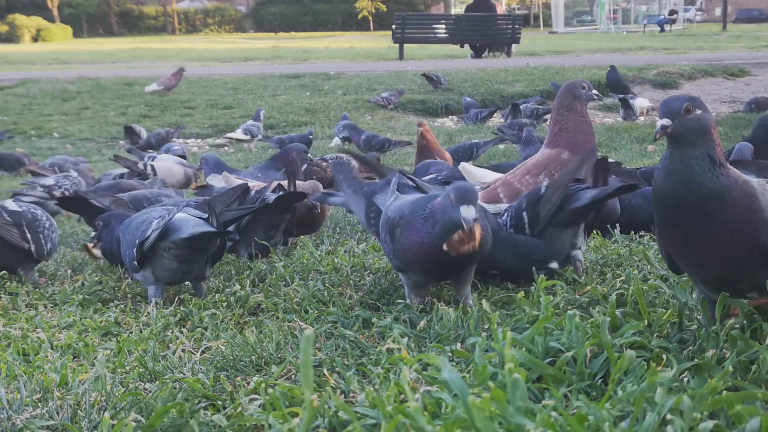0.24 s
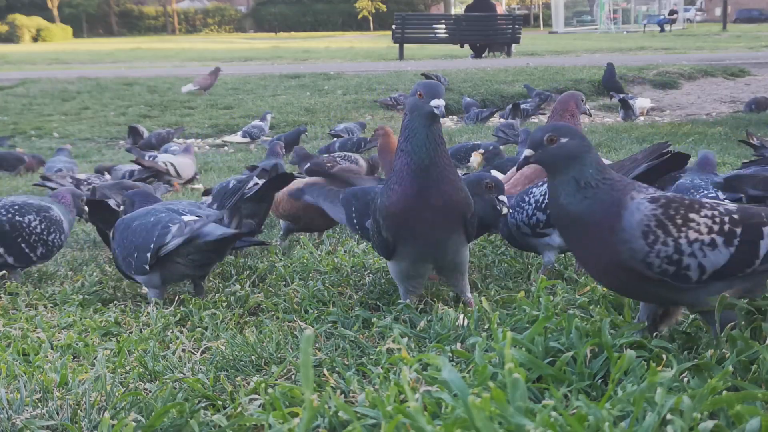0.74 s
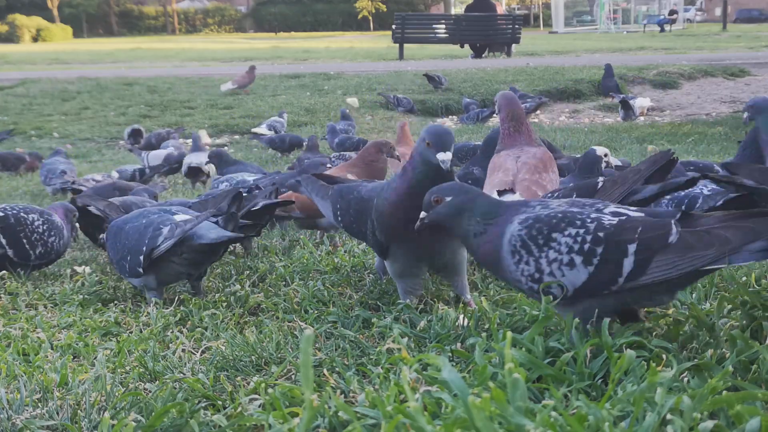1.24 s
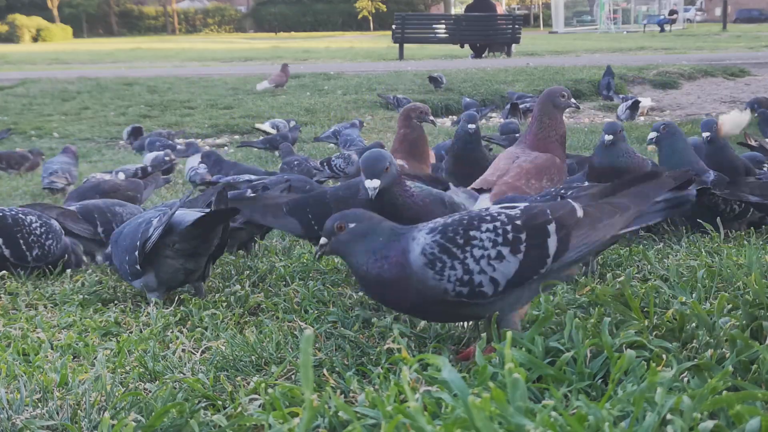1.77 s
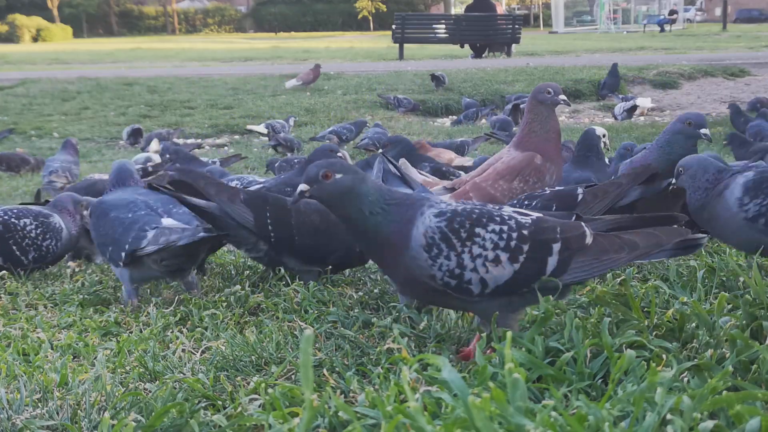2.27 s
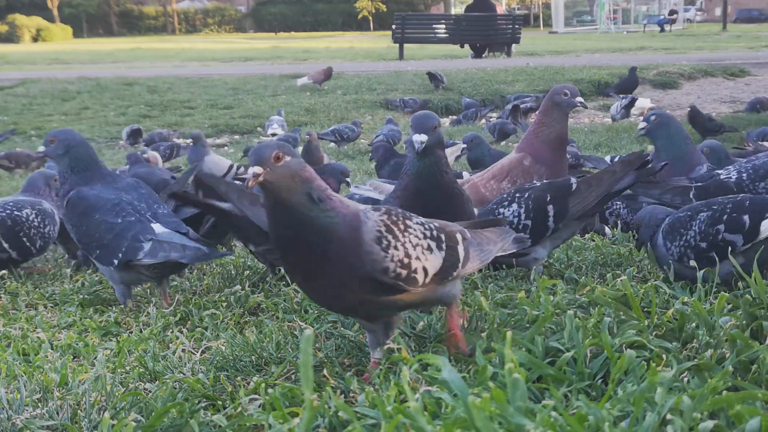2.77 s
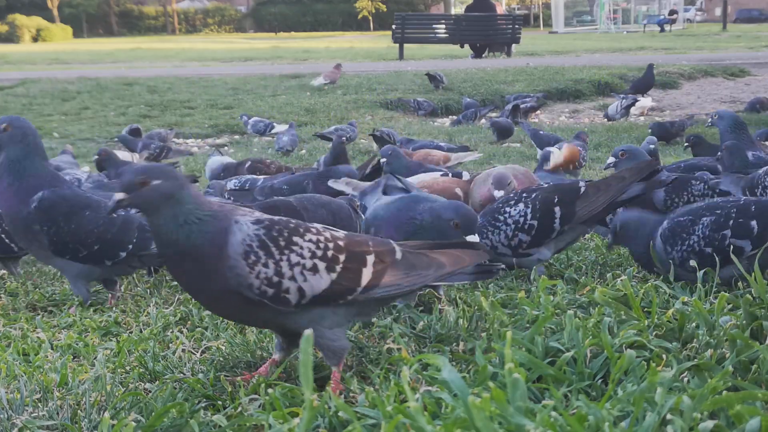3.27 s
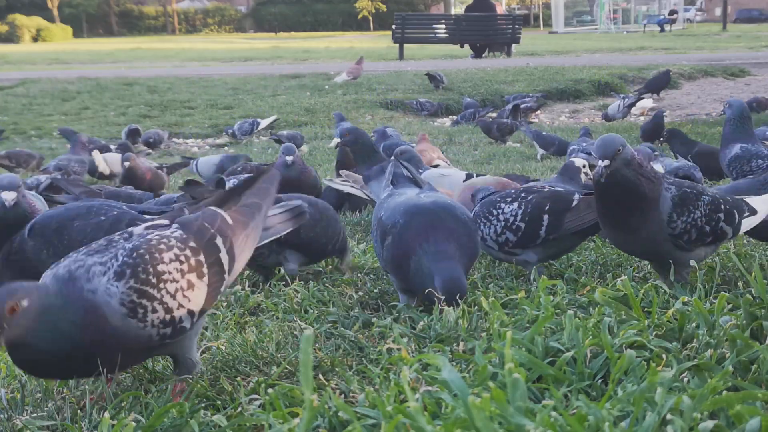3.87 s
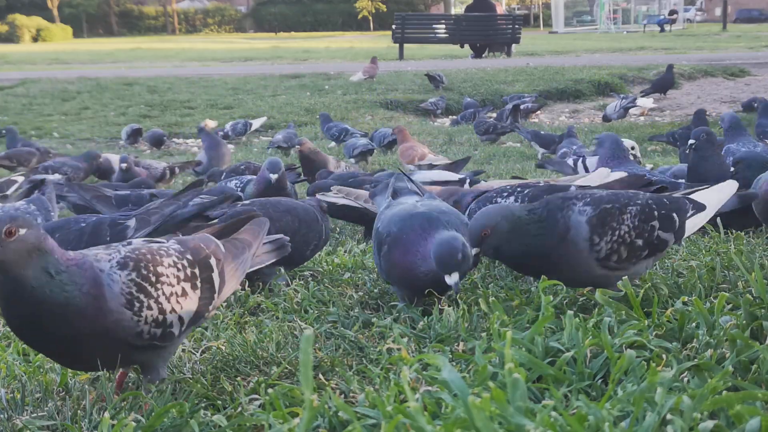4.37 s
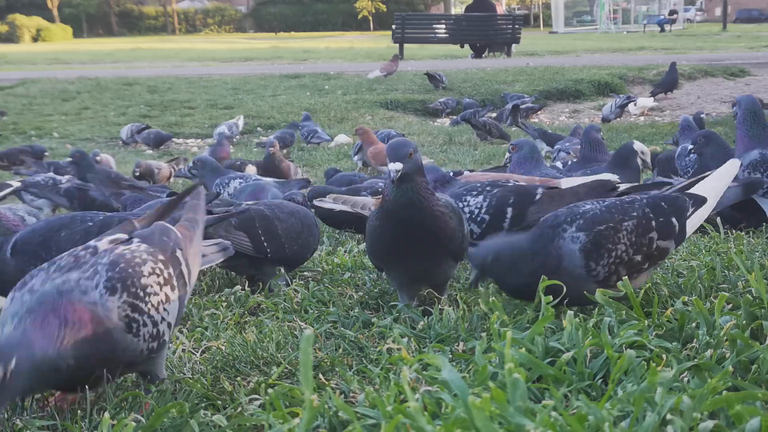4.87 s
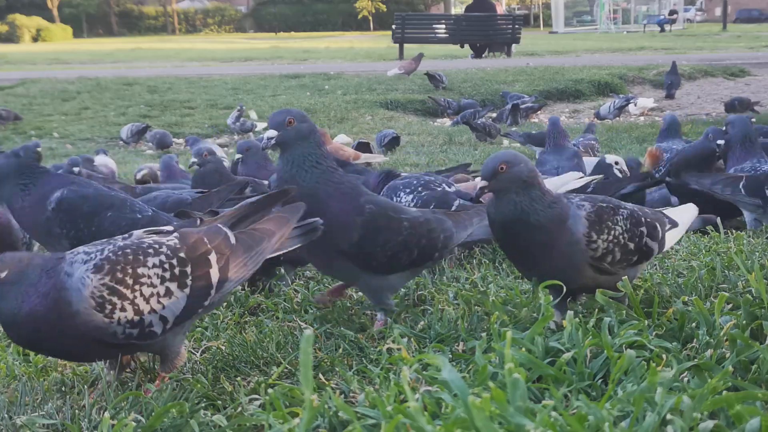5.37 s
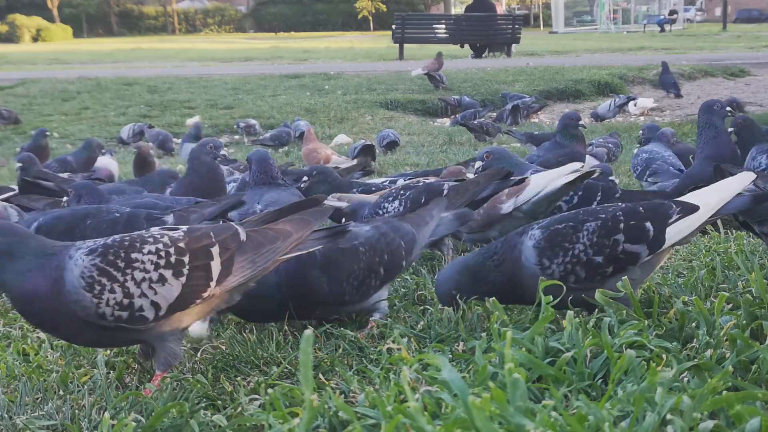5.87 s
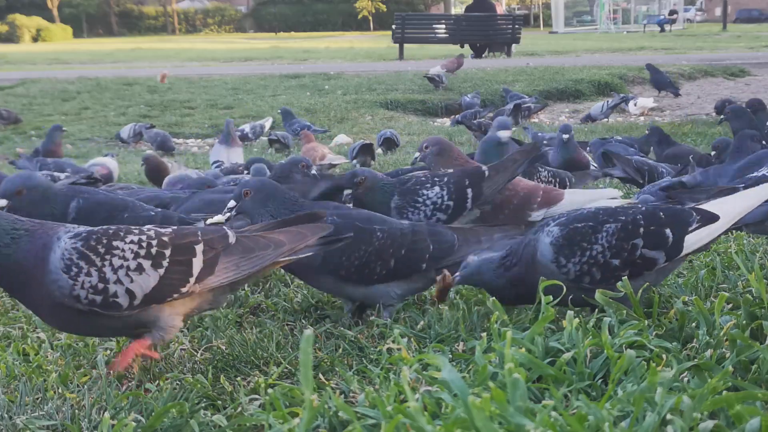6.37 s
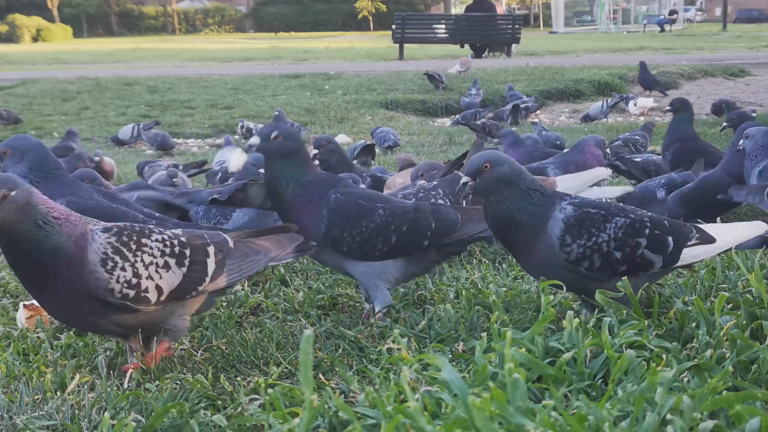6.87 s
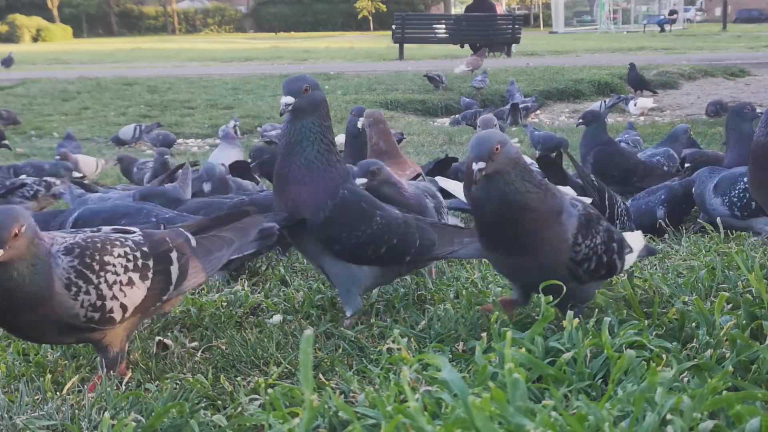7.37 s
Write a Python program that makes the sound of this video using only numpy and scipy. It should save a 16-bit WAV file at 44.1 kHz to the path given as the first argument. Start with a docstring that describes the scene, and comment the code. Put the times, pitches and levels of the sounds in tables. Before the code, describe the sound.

A flock of pigeons feeds close by on a park lawn, with soft throaty clucks, faint coos, beak ticks and grassy rustles. A near bird gives three leaping whistles, then three double whistles. Around four seconds a farther songbird warbles rapidly with echo from trees, joined by brief twitters. Pigeons grow busier near the end. Deep engine throb and traffic rumble continue throughout, in wide outdoor stereo with the microphone low near the birds.

```python
"""Pigeons feed on a park lawn: crop puffs and rolled coos, a low mutter, noise ticks, grassy rustles.
A near bird whistles six phrases and two peeps as near-pure gliding tones.
A farther songbird warbles among echoing trees, with faint calls; a third twitters in glides and chips.
An idling engine and a slowing vehicle rumble as low tones under banded noise of traffic and city."""
import sys
import numpy as np
from scipy import signal
from scipy.io import wavfile
from scipy.ndimage import uniform_filter1d

SR = 44100
rng = np.random.default_rng(int(sys.argv[2]) if len(sys.argv) > 2 else 0)


def inscribe(sig):
    """Save sig as 16-bit PCM at rate SR to the path in sys.argv[1].

    A 1-D sig is mono; a 2-D sig holds one channel per row.
    Samples are clipped to [-1, 1] before scaling.
    """
    pcm = np.round(np.clip(np.atleast_2d(sig).T, -1, 1) * 32767)
    wavfile.write(sys.argv[1], SR, pcm.astype(np.int16))


N = 336924


def amp(db):
    """Decibels to gain."""
    return 10 ** (np.asarray(db) / 20)


def rms_one(x):
    """Scales to unit rms."""
    return x / np.sqrt(np.mean(x ** 2) + 1e-20)


def in_time(rows):
    """Columns of a curve at every sample."""
    s, *columns = np.transpose(rows)
    return [np.interp(np.arange(N) / SR, s, c) for c in columns]


def at_hz(points, hz):
    """Reads a spectrum on a log-frequency axis."""
    point_hz, values = np.transpose(points)
    return np.interp(np.log(hz), np.log(point_hz), values)


def drift(rate_hz):
    """Random wander of spread 1: noise through two equal poles at SR / 40, interpolated."""
    step = 40
    r = np.exp(-2 * np.pi * rate_hz * step / SR)
    warmup = 2000
    noise = rng.standard_normal(N // step + warmup + 2)
    slow = signal.lfilter([1], [1, -2 * r, r * r], noise)[warmup:]
    return np.interp(np.arange(N) / step, np.arange(len(slow)), rms_one(slow))


def resonance(x, hz, width_hz):
    """Two-pole resonance with gain 1 on top."""
    r = np.exp(-np.pi * width_hz / SR)
    zeros = (1 - r * r) / 2 * np.array([1, 0, -1])
    poles = [1, -2 * r * np.cos(2 * np.pi * hz / SR), r * r]
    return signal.lfilter(zeros, poles, x)


def note(rows, edge_s, waver=np.zeros(N)):
    """Samples, phase, fade (sine to unit rms) and level gains of a note; waver bends pitch by a share."""
    s, hz, *levels_db = np.transpose(rows)
    at = np.arange(int(s.min() * SR), min(int(s.max() * SR), N))
    t = at / SR
    fade = np.clip(np.minimum(t - s.min(), s.max() - t) / edge_s, 0, 1)
    cycles = np.cumsum(np.interp(t, s, hz) * (1 + waver[at])) / SR
    phase = 2 * np.pi * (cycles + rng.random())
    return at, phase, np.sqrt(2) * fade, [amp(np.interp(t, s, db)) for db in levels_db]


def glide(row, strength=((1, 0), (2, 0))):
    """Curve rows of a glide with one rounded turn, an even swell or fade and a pitch-dependent strength."""
    start_s, turn_s, end_s, start_hz, turn_hz, end_hz, level_db, swell_db = row
    s = np.linspace(start_s, end_s, 40)
    hz = np.interp(s, (start_s, turn_s, end_s), (start_hz, turn_hz, end_hz))
    hz = uniform_filter1d(hz, size=7, mode="nearest")
    db = level_db + np.linspace(-.5, .5, len(s)) * swell_db + at_hz(strength, hz)
    return np.transpose([s, hz, db])


def air(patchy_db):
    """Traffic wash and city hiss: third-octave stereo noise, each band with its own level and flicker."""
    # relative noise density: hz, density_db (per Hz)
    density = [(20, -8.5), (45, -5.5), (100, -8.5), (180, -16), (400, -31), (700, -36), (1350, -41.5),
               (1800, -38), (2400, -38.5), (3300, -46), (5000, -48.5), (7000, -47.5), (10000, -55),
               (15500, -55)]
    # left-right correlation: hz, likeness (-1 to 1)
    likeness = [(60, 1.0), (130, 0.94), (290, 0.66), (640, -0.8), (1410, 0.13), (3100, 0.28), (6820, 0.5),
                (15000, 1)]
    wash_db, ebb_db_per_s = -36, -0.47
    start_db, start_fade_s = 6.5, 0.19   # extra level at the start
    out = 0
    edges_hz = 20 * 2 ** np.arange(0, 10.1, 1 / 3)
    white = rng.standard_normal((2, 2, N))
    for k, (low, high) in enumerate(zip(edges_hz, edges_hz[1:])):
        band = signal.butter(2, [low, high], "band", fs=SR, output="sos")
        mid, side = signal.sosfilt(band, white[k % 2])   # neighbours use separate noise
        hz = np.sqrt(low * high)
        alike = np.clip(at_hz(likeness, hz), -1, 1)
        gain = amp(at_hz(density, hz) + patchy_db * drift(1.23))
        out = out + gain * (np.sqrt(1 + alike) * mid + np.sqrt(1 - alike) * side * [[1], [-1]])
    t = np.arange(N) / SR
    level_db = wash_db + ebb_db_per_s * t + start_db * np.exp(-t / start_fade_s)
    return amp(level_db) * rms_one(out)


def engine():
    """A wavering firing throb with its octave, a third-order drone, and a second vehicle slowing down."""
    # idling levels: time_s, throb_db, drone_db
    levels = [(0.0, -29.5, -47), (0.21, -34.5, -36.5), (1.0, -33.5, -49), (1.47, -30.5, -39),
              (1.74, -29, -52.5), (2.02, -30.5, -36), (2.62, -39, -46), (3.23, -43, -48), (3.57, -31, -41),
              (3.89, -45, -52), (4.3, -32.5, -48.5), (4.76, -44.5, -44.5), (4.89, -39.5, -60),
              (5.19, -35, -49.5), (6.0, -38, -48), (7.47, -33.5, -48), (7.53, -53, -63), (7.64, -40, -55)]
    # slowing vehicle: start_s, turn_s, end_s, start_hz, turn_hz, end_hz, level_db, swell_db
    passing = (5, 5, 6, 41, 36, 34, -35, -11)
    throb_hz = 46.4
    throb_db, drone_db = in_time(levels)
    phase = 2 * np.pi * np.cumsum(throb_hz * (1 + .01 * drift(3.43))) / SR
    throb = np.sin(phase) * amp(2.1 * drift(22))
    throb = throb + amp(-12.5 + 3.7 * drift(14)) * np.sin(2 * phase)
    drone_phase = 2 * np.pi * np.cumsum(3 * throb_hz * (1 + 0.008 * drift(3.52))) / SR
    drone = np.sin(drone_phase) * amp(2.1 * drift(7.5))
    out = amp(throb_db) * rms_one(throb) + amp(drone_db) * rms_one(drone)
    at, phase, fade, (level,) = note(glide(passing), edge_s=0.055)
    out[at] += fade * level * (np.sin(phase) + amp(-7) * np.sin(2 * phase))
    return out


def murmur():
    """Many throats blur into a lumpy low mutter: wide stereo noise through throat resonances."""
    # swells and lulls: centre_s, change_db
    swells = [(0.05, 3.5), (2.8, 6.5), (5.1, -16), (6.8, 9.5), (7.6, -11)]
    base_db, swell_s = -56, 0.18
    noise = rng.standard_normal((3, N)) * amp(3.5 * drift(16))
    opposed = 0.69 * noise[0] * np.array([[1], [-1]])
    voices = opposed + noise[1:] + .5 * noise[1]
    throat = resonance(resonance(voices, 270, 260), 270, 260)
    overtone = resonance(resonance(voices, 620, 180), 620, 180)
    t = np.arange(N) / SR
    level_db = base_db + sum(db * np.exp(-((t - s) / swell_s) ** 2) for s, db in swells)
    return amp(level_db) * (rms_one(throat) + amp(-19.0) * rms_one(overtone))


def rustle():
    """Feathers and feet brush the grass: swells of clumped noise grains, a bright band over a duller body."""
    # brushes: start_s, end_s, bright_level_db, bright_centre_hz
    brushes = [ (0, 0.194, -52.5, 6700), (0.096, 0.346, -62, 6060), (0.13, 0.17, -50, 5000),
               (0.996, 1.107, -58, 7204), (1.19, 1.357, -55.5, 6700), (1.677, 1.981, -59, 5530),
               (2.242, 2.338, -56.5, 6880), (2.396, 2.41, -57, 8000), (2.72, 2.86, -66, 7500),
               (3.494, 3.628, -53.5, 6200), (4.2, 4.27, -56, 6600), (4.334, 4.48, -59, 6700),
               (6.298, 6.41, -63, 7100), (6.565, 6.706, -61, 6500), (6.657, 7.082, -59.5, 4300),
               (6.736, 6.774, -53.5, 6000), (6.777, 6.817, -53, 6900), (6.853, 6.91, -53.5, 6100),
               (6.952, 6.972, -58, 6500), (6.98, 7.012, -52, 6270), ]
    out = np.zeros((2, N))
    clumps = amp(2.5 * rng.exponential(1, N) + 3.4 * drift(70))
    noise = rng.standard_normal((3, N)) * clumps
    grains = noise[0] + 0.61 * noise[1:]   # shared part plus one per channel
    for start, end, level_db, hz in brushes:
        at = slice(int(start * SR), int(end * SR))
        bright = resonance(resonance(grains[:, at], hz, 2300), hz, 2300)
        body = resonance(resonance(grains[:, at], 3600, 2000), 3600, 2000)
        brush = rms_one(bright) + amp(-8) * rms_one(body)
        out[:, at] += amp(level_db) * brush * signal.windows.tukey(brush.shape[1], .6)
    return out


def ticks():
    """Beak and claw ticks: millisecond noise bursts through a broad resonance, a little to the left."""
    # ticks: start_s, peak_db (before panning), centre_hz
    tick_rows = [(0.0358, -28, 2550), (0.049, -35, 7300), (0.057, -38, 7500), (0.11, -36, 2300),
                 (0.1262, -29, 3260), (0.1566, -28.5, 2630), (0.2418, -34.5, 2320), (0.315, -35.5, 5180),
                 (2.4324, -40, 2550), (2.7405, -41, 2130), (3.528, -37, 4206), (7.263, -42, 2470)]
    pan_db = np.array([[2.5], [-2.5]])
    out = np.zeros((2, N))
    t = np.arange(int(0.004 * SR)) / SR
    for s, peak_db, hz in tick_rows:
        noise = rng.standard_normal((3, len(t))) * np.exp(-t / 0.0046)
        burst = noise[0] + 2.0 * noise[1:]
        burst = resonance(burst, hz, 2200) + 0.044 * np.diff(burst, prepend=0)
        at = int(s * SR)
        out[:, at:at + len(t)] += amp(peak_db + pan_db) * burst / np.abs(burst).max()
    return out


def pigeons():
    """Clucks are short falling puffs from the inflated crop; coos are long and rolled."""
    # clucks: start_s, nominal_level_db, nominal_pitch_hz, octave_db (re fundamental)
    clucks = [(0.171, -31, 320, -30), (0.273, -35, 322, -27), (0.342, -32, 300, -28),
              (0.407, -33, 310, -28), (0.455, -35.5, 356, -28), (1.412, -38.5, 276, -8),
              (1.455, -40.5, 396, -5), (1.532, -32.5, 297.2, -14), (2.2, -38.5, 324, -2.5),
              (2.278, -40.5, 388, 0), (2.368, -35.5, 340, -6.5), (2.428, -40.5, 422, -14),
              (2.68, -42.5, 400, -10), (2.775, -37, 320, -15), (2.815, -40.5, 400, -10),
              (3.425, -42.5, 300, -18), (3.69, -38, 320, -18), (2.49, -34.5, 280, -11),
              (2.738, -38.5, 298, -0.5), (2.873, -37, 384, -15), (3.297, -40, 319, -4.5),
              (3.378, -39, 402, -10), (3.475, -34.5, 309, -16), (3.863, -42, 460, -18),
              (3.924, -37, 300, -9), (4.022, -39, 356, -12), (5.446, -33.5, 290, -21),
              (5.534, -36, 330, -15), (5.585, -37.5, 345, -9.5), (6.242, -34.5, 343, -18),
              (6.353, -31, 359, -26), (6.48, -37, 313, -17), (6.535, -35, 298, -15),
              (6.663, -36.5, 430, -22), (6.708, -35, 330, -10), (6.761, -34, 364, -1.5),
              (6.834, -34, 365, -2), (6.885, -38, 363, -5), (6.955, -38.5, 300, -3.5),
              (6.395, -39, 360, -15), (6.452, -42, 380, -17), (7.195, -43, 377, -15)]
    # coos: start_s, turn_s, end_s, start_hz, turn_hz, end_hz, level_db, swell_db
    coos = [ (.47, 0.68, .77, 334, 311, 249, -47, -1), (1.611, 1.699, 1.88, 385, 336, 286, -50, -7),
            (2.481, 2.541, 2.7, 292, 249, 424, -54, -3), (3.601, 3.72, 3.73, 268, 286.4, 304.4, -52.5, 3),
            (4.24, 4.301, 4.55, 454, 355.2, 320.5, -49, 1),
            (4.469, 4.601, 4.84, 321, 350.5, 282.6, -52, -4),
            (4.1, 4.261, 4.53, 290.5, 262.8, 232.5, -49, 8), (6.678, 6.78, 6.87, 330.3, 308, 288, -47, -4),
            (6.9, 6.981, 7.1, 358, 331.3, 304, -52.5, 0), (7.079, 7.18, 7.36, 299.6, 238, 298.5, -45, -4.5),
            ]
    out = np.zeros((2, N))
    sides = np.array([[.5], [-.5]])   # phase offset between channels
    t = np.arange(int(.06 * SR)) / SR
    puff = (t / 0.0067 * np.exp(1 - t / 0.0059)) ** 1.5
    for s, level_db, hz, octave_db in clucks:
        phase = 2 * np.pi * hz * t * (1.04 - 2.3 * t) + 1.05 * sides
        tone = np.sin(phase) + amp(octave_db) * np.sin(2 * phase)
        at = int(s * SR)
        out[:, at:at + len(t)] += amp(level_db + 1.5) * puff * tone
    roll = amp(3.6 * drift(35))
    for row in coos:
        at, phase, fade, (level,) = note(glide(row), edge_s=0.011)
        phase = phase + 1.02 * sides
        out[:, at] += fade * level * roll[at] * (np.sin(phase) + amp(-20) * np.sin(2 * phase))
    return out


def leap_notes():
    """Leaping whistles: a climb, a break to the top register with a squeak, and a drop."""
    # leaps: break_s, climb_s, top_s, drop_s, top_hz, top_last_hz, drop_hz,
    # top_db, climb_end_db, drop_db, squeak_db, overtones_db
    leaps = [(1.106, 0.047, 0.045, 0.052, 3282, 3170, 2450, -24.5, -33, -33.5, -60, -9),
             (1.65, .055, .044, 0.059, 3480, 3534, 2556, -19, -34, -30, -39, 1),
             (2.158, 0.041, 0.054, 0.038, 3418, 3180, 2440, -17.5, -28, -30.5, -43, 2.5)]
    # top: share_of_length, share_of_top_pitch, share_of_way_to_last_pitch, change_db
    top_shape = [(0, .947, 0, -9), (.6, 1.0, 0, -0.5), (.82, 1.0, 0.25, -1), (1, 1.0, 1, -6.5)]
    # drop: share_of_length, share_of_pitch, change_db
    drop_shape = [(0, 1.14, -3), (.22, 1.03, -0.5), (.75, .99, -3), (1, .98, -22)]
    climb_hz, climb_start_db = (2060, 2380, 2900), (-50, -41)   # start, middle, end; start, middle
    overlap_s = 0.0083   # both registers sound at the break
    squeak_s, squeak_hz = 0.018, (3750, 4000)
    drop_overtones_db = (4, -24)   # they flare as the drop starts and die along it
    notes = []
    climb_share = np.array([0, .5, 1])
    share, pitch, way, shape_db = np.transpose(top_shape)
    drop_share, drop_pitch, drop_shape_db = np.transpose(drop_shape)
    for s, climb_s, top_s, drop_s, hz, last_hz, drop_hz, db, climb_db, drop_db, squeak_db, upper_db in leaps:
        climb_times = s + overlap_s - (climb_s + overlap_s) * (1 - climb_share)
        climb = np.transpose([climb_times, climb_hz, [*climb_start_db, climb_db]])
        top = np.transpose([s + top_s * share, hz * pitch + way * (last_hz - hz), db + shape_db])
        drop_times = s + top_s + drop_s * drop_share
        drop = np.transpose([drop_times, drop_hz * drop_pitch, drop_db + drop_shape_db])
        squeak = [(s, squeak_hz[0], squeak_db), (s + squeak_s, squeak_hz[1], squeak_db)]
        even = (upper_db, upper_db)
        notes += [(climb, even), (top, even), (drop, drop_overtones_db), (squeak, even)]
    return notes


def pair_notes():
    """Double whistles: a short and a long arch of pitch joined over a quiet low valley."""
    # pairs: start_s, valley_s, end_s, short_top_hz, short_db, long_top_hz, sag_hz, long_db,
    # valley_db, last_fall_s
    pairs = [(2.504, 2.564, 2.687, 2996, -25, 3163, 152, -27.5, -53, 0.023),
             (2.897, 2.959, 3.103, 3040, -27, 3170, -89, -29, -105, 0.039),
             (3.284, 3.348, 3.488, 3060, -28, 3210, 87, -27.5, -105, .026)]
    scoop_s, settle_s, fall_s = .012, .013, .016   # up to an arch, on to its top, down from it
    shoulder_s = .013   # foot to valley
    foot_hz, foot_db, valley_hz, last_hz = 2225, -19, 1940, 2430
    notes = []
    for start, valley, end, short_hz, short_db, long_hz, sag_hz, long_db, valley_db, last_fall in pairs:
        down, up = valley - shoulder_s, valley + shoulder_s
        sagged_hz = long_hz - sag_hz
        short_arch = [
            (start, foot_hz, short_db + foot_db),
            (start + scoop_s, .985 * short_hz, short_db - 4.0),
            ((start + scoop_s + down - fall_s) / 2, short_hz, short_db),
            (down - fall_s, .98 * short_hz, short_db),
            (down, foot_hz, short_db + 0.87 * foot_db)]
        long_arch = [
            (up, foot_hz, long_db + foot_db),
            (up + scoop_s, .965 * long_hz, long_db),
            (up + scoop_s + settle_s, long_hz, long_db),
            (end - last_fall, sagged_hz, long_db),
            (end - 0.53 * last_fall, .945 * sagged_hz, long_db - 4.0),
            (end, last_hz, long_db + foot_db)]
        notes.append((short_arch + [(valley, valley_hz, valley_db)] + long_arch, (0, 0)))
    return notes


def peep_notes():
    """Short peeps of steady pitch."""
    # peeps: start_s, pitch_hz, level_db
    peeps = [(4.358, 3330, -51.5), (6.105, 3355, -55)]
    peep_s, overtones_db = 0.016, (-22, -22)
    return [([(s, hz, db), (s + peep_s, hz, db)], overtones_db) for s, hz, db in peeps]


def whistler():
    """Near-pure notes; overtones swell much less than the fundamental and are coloured by the open beak."""
    main, upper = np.zeros((2, N))
    waver = .008 * drift(45)   # share of pitch
    for rows, (upper_start_db, upper_end_db) in leap_notes() + pair_notes() + peep_notes():
        at, phase, fade, (level,) = note(rows, edge_s=.004, waver=waver)
        main[at] += fade * level * np.sin(phase)
        overtones = np.sin(2 * phase) + amp(-3.0) * np.sin(3 * phase) + amp(-10.0) * np.sin(4 * phase)
        upper_gain = amp(np.linspace(upper_start_db, upper_end_db, len(at)))
        upper[at] += upper_gain * fade * level ** 0.34 * overtones
    beak = resonance(upper + 1e-18, 3550, 2500)   # offset avoids denormals
    return main * amp(1.2 * drift(60)) + amp(-40 + 4.5 * drift(30)) * beak


def songbird(notes, octave_db, flutter_db, flutter_rate_hz, hiss_db, waver=.012):
    """Gliding sines with a weak octave; the syrinx flutters and spreads a little of each note into hiss."""
    out = np.zeros(N)
    bend = waver * drift(flutter_rate_hz)
    for rows in notes:
        at, phase, fade, (level,) = note(rows, edge_s=0.0043, waver=bend)
        out[at] += fade * level * (np.sin(phase) + amp(octave_db) * np.sin(2 * phase))
    return out * (amp(flutter_db * drift(flutter_rate_hz)) + amp(hiss_db) * rng.standard_normal(N))


def far_calls():
    """Faint straight glides from across the park, with strong flutter and waver."""
    # calls: start_s, end_s, start_hz, end_hz, level_db
    call_rows = [(3.12, 3.22, 4030, 3570, -73.5), (3.44, 3.617, 4160, 4160, -72.5),
                 (5.89, 6.1, 5550, 5432, -79), (6.02, 6.179, 5070, 4970, -77),
                 (6.129, 6.3, 5420, 5500, -77), (6.38, 6.66, 5150, 4840, -78),
                 (6.58, 6.68, 6200, 6150, -76)]
    notes = [[(start, start_hz, db), (end, end_hz, db)] for start, end, start_hz, end_hz, db in call_rows]
    return songbird(notes, octave_db=-42, flutter_db=6.0, flutter_rate_hz=60, hiss_db=-53, waver=.022)


def warbler():
    """Warbled syllables, each a glide with one turn, strongest in the middle of the voice's range."""
    # syllables: start_s, turn_s, end_s, start_hz, turn_hz, end_hz, level_db (before range), swell_db
    syllables = [ (3.902, 3.92, 3.935, 3710, 6458, 4690, -34, 22),
                 (3.936, 3.943, 3.95, 4680, 4576, 4500, -28.5, 0.5),
                 (4.007, 4.014, 4.023, 3330, 4060, 4790, -31.5, 19),
                 (4.021, 4.039, 4.046, 4760, 6200, 5000, -32, -8),
                 (4.082, 4.087, 4.09, 5970, 5080, 4200, -25.5, -8),
                 (4.105, 4.135, 4.157, 5150, 4112, 4086, -25.5, -2),
                 (4.165, 4.175, 4.183, 4745, 4745, 4770, -22, 1),
                 (4.179, 4.194, 4.197, 4770, 5860, 4850, -26, 2),
                 (4.217, 4.24, 4.255, 4980, 5016, 5000, -29, -2),
                 (4.265, 4.284, 4.304, 5090, 4123, 4046, -25, -5),
                 (4.341, 4.355, 4.368, 4550, 5140, 5130, -24, -6),
                 (4.38, 4.388, 4.398, 4855, 4710, 3920, -25, -17),
                 (4.41, 4.425, 4.436, 4670, 4810, 4820, -24.5, -5),
                 (4.434, 4.444, 4.462, 5010, 5480, 4770, -29, -6),
                 (4.496, 4.509, 4.525, 5140, 6250, 4710, -23, -2.5),
                 (4.522, 4.535, 4.55, 4680, 4920, 5140, -26.5, -8),
                 (4.58, 4.601, 4.63, 5370, 6120, 5300, -21, -2),
                 (4.675, 4.693, 4.712, 3830, 3440, 3960, -23, 5),
                 (4.711, 4.722, 4.735, 3950, 4183, 4235, -25, -1),
                 (4.765, 4.799, 4.815, 5120, 3730, 3320, -27, -1.5),
                 (4.837, 4.852, 4.9, 4420, 5095, 4270, -23, -2),
                 (4.93, 4.964, 4.98, 5790, 3954, 4120, -29.5, 0),
                 (5.008, 5.017, 5.024, 5550, 5480, 5380, -24, 5),
                 (5.026, 5.06, 5.068, 5190, 3904, 4040, -26, 3),
                 (5.108, 5.13, 5.172, 4266, 4430, 4230, -32, -6),
                 (5.225, 5.241, 5.255, 4084, 3830, 3580, -36, 11),
                 (5.304, 5.328, 5.35, 4120, 4080, 4480, -38, -1), ]
    # strength over the range: hz, change_db
    voice_range = [(3100, -20), (3700, -4.5), (4600, -0.5), (5400, -2.5), (6300, -10.5)]
    notes = [glide(row, voice_range) for row in syllables]
    return songbird(notes, octave_db=-43.0, flutter_db=3.0, flutter_rate_hz=108, hiss_db=-44.5)


def chip(s, length_s, high_hz, low_hz, db):
    """Curve rows of a falling chip: the pitch lingers up to a knee, the level swells."""
    knee_share, early_fall_share, swell_db = .35, 0.13, 10
    knee_hz = high_hz - early_fall_share * (high_hz - low_hz)
    return [(s, high_hz, db - swell_db),
            (s + knee_share * length_s, knee_hz, db - 0.76 * swell_db),
            (s + length_s, low_hz, db)]


def twitterer():
    """A trill in two simultaneous voices and falling chips, both with fast flutter."""
    # one curve per voice: time_s, pitch_hz, level_db
    trill = [
        [(4.727, 5000, -35), (4.74, 7092, -37.5), (4.755, 7377, -34), (4.768, 6400, -40), (4.776, 7200, -32),
         (4.786, 5317, -33), (4.794, 6660, -32.5), (4.801, 5120, -29.5), (4.811, 5560, -28), (4.822, 4440, -38)],
        [(4.735, 6630, -50), (4.742, 8300, -43), (4.757, 8640, -39), (4.768, 7200, -36.5)],
    ]
    # chips: start_s, length_s, start_hz, end_hz, end_level_db
    chip_rows = [(4.715, .011, 9500, 4960, -34), (4.782, 0.0076, 8320, 6700, -27.5),
                 (5.159, 0.017, 7100, 5370, -36.5), (5.19, 0.012, 6500, 5260, -34.5),
                 (5.257, .016, 7020, 4670, -35), (5.285, .016, 6300, 4500, -33)]
    flutter = dict(flutter_db=4.5, flutter_rate_hz=430)
    voices = songbird(trill, octave_db=-15, hiss_db=-22.5, **flutter)
    chips = songbird([chip(*row) for row in chip_rows], octave_db=-10, hiss_db=-19, **flutter)
    return voices + chips


def trees(x, echo_db, scatter_db):
    """Two early echoes, and lumpy scatter from trunks and leaves that dies away."""
    # nearest trunk and ground: delay_s, relative_db
    echoes = [(.0085, -1.5), (.019, -8)]
    t60_s = .36
    t = np.arange(int(t60_s * SR)) / SR
    lumps = amp(2.3 * drift(130)[:len(t)])
    decay = amp(-60 * t / t60_s) * np.clip(t / 0.0065, 0, 1)
    scatter = lumps * rng.standard_normal(len(t)) * decay
    response = amp(scatter_db) * scatter / np.sqrt(np.sum(scatter ** 2))
    response[0] = 1   # direct sound
    for delay_s, db in echoes:
        response[int(delay_s * SR)] += amp(db + echo_db)
    return signal.fftconvolve(x, response)[:N]


def scene():
    """Songbirds and engine in the centre, pigeons and air spread in stereo."""
    flock = murmur() + rustle() + ticks() + pigeons()
    near = trees(whistler(), echo_db=-16.5, scatter_db=-32.0)
    near = near + trees(twitterer(), echo_db=-14, scatter_db=-26.0)
    far = trees(far_calls() + warbler(), echo_db=-1.1, scatter_db=-1.5)
    return air(patchy_db=-0.83) + engine() + flock + near + far


def record(dry):
    """Cuts the top steeply with an elliptic low-pass."""
    cutoff_hz = 15700
    return signal.sosfilt(signal.ellip(12, .3, 70, cutoff_hz, fs=SR, output="sos"), dry)


dry = scene()
out = record(dry)
inscribe(out)
```